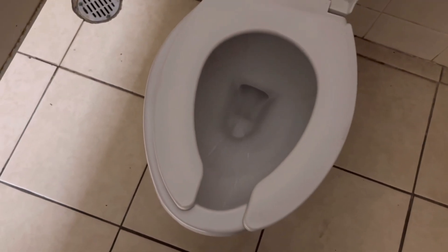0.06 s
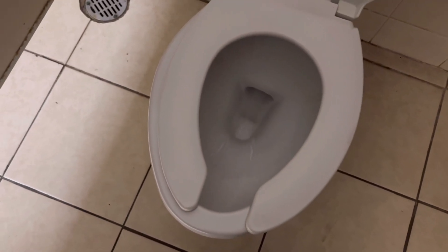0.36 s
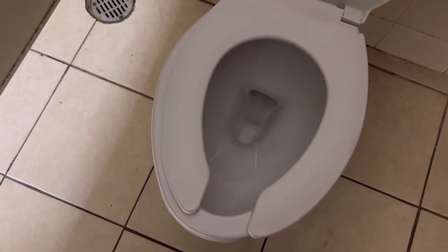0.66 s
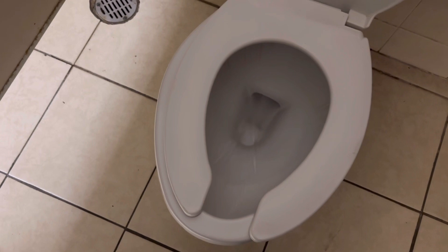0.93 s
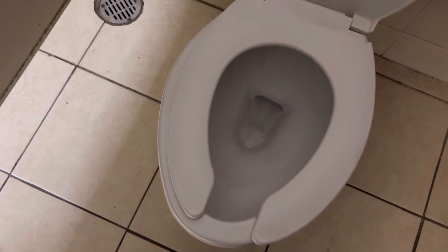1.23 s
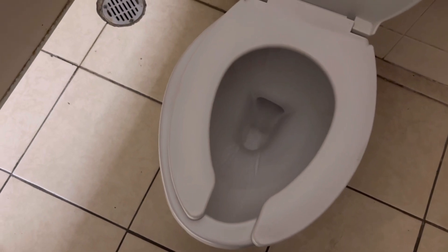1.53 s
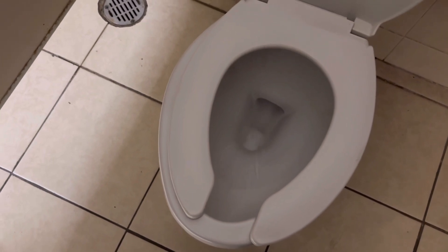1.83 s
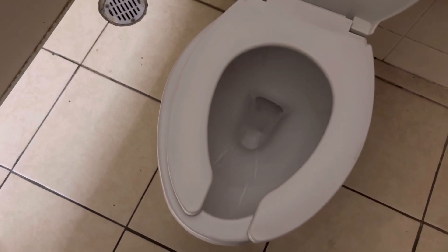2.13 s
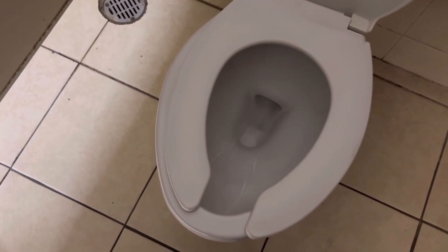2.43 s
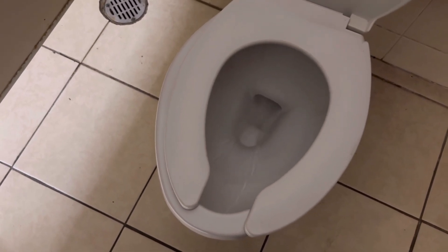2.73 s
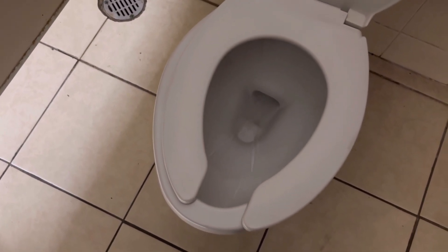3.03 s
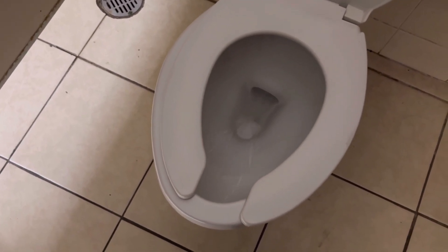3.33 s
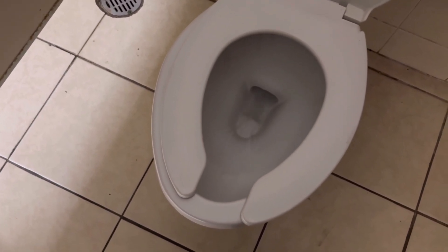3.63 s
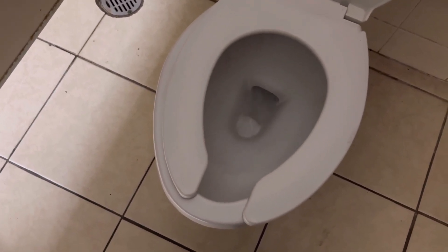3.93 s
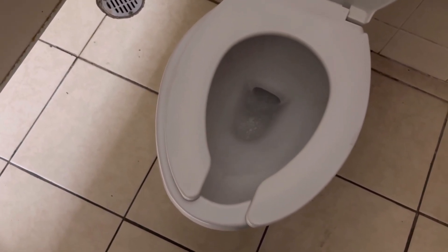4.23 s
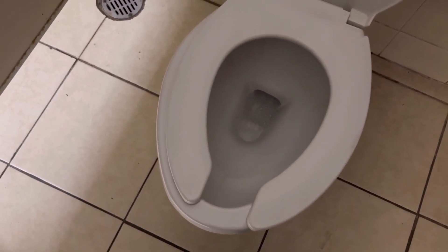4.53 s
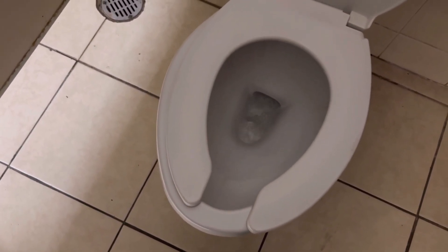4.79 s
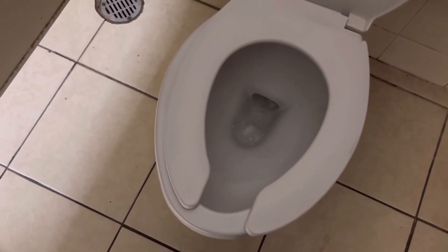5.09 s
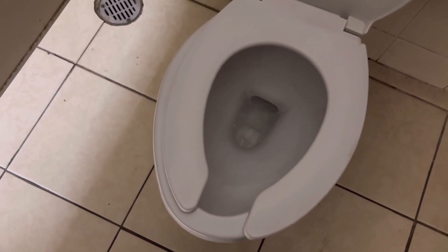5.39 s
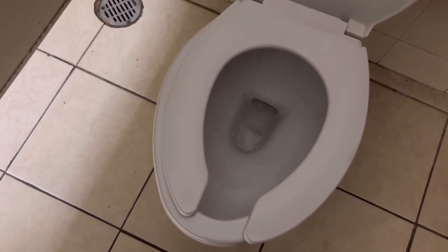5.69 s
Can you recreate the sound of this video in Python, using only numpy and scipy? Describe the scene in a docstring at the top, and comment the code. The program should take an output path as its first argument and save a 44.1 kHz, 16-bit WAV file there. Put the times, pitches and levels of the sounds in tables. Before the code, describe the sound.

A toilet flushes in a small tiled restroom, heard from just above the bowl. Water hisses and spatters loudly while the pool churns, gurgles and booms hollowly. After about three and a half seconds the rush shuts off, the drain gives a few low gulps, and a thin, quiet trickle drips into the water. Ventilation rumbles faintly underneath.

```python
"""A flush-valve toilet in a small tiled restroom, heard from just above the bowl.
Rim jets hiss and spatter; the churning pool makes the air in the drain and bowl boom.
The valve shuts, the siphon breaks with a few gulps, and a thin trickle drips into the pool.
Ventilation rumbles faintly throughout."""
import sys
import numpy as np
from scipy import signal
from scipy.fft import rfft, irfft, next_fast_len
from scipy.io import wavfile
from scipy.ndimage import uniform_filter1d

SR = 44100
rng = np.random.default_rng(int(sys.argv[2]) if len(sys.argv) > 2 else 0)


def to_wav(s):
    """Save 16-bit WAV."""
    ch = np.atleast_2d(s).T  # columns
    pcm = np.round(np.clip(ch, -1, 1) * 32767)  # PCM
    wavfile.write(sys.argv[1], SR, pcm.astype(np.int16))


N = 262383
N_FFT = 2 * next_fast_len(N // 2 + SR // 8, True)
TIME, HZ = np.arange(N) / SR, np.fft.rfftfreq(N_FFT, 1 / SR)

# flow: stutter, steady rush, valve closing, last spurt (time [s], jet hiss [dB], pool churn [dB])
FLOW = [(0, -25.5, -28), (.22, -27.5, -28.5), (.27, -29.5, -26), (.34, -27, -30.5), (.55, -27, -28.5),
        (.66, -27.5, -30), (.85, -26.5, -30), (1.4, -27, -27), (2.05, -26, -30.5), (3.14, -27, -32.5),
        (3.38, -28.5, -36.5), (3.61, -32.5, -36.5), (3.73, -42, -38.5), (3.8, -43, -33.5),
        (3.91, -41, -36.5), (3.97, -54, -41.5), (4.22, -59, -51)]
# bowl resonances over still water (centre [Hz], width [Hz], lift [dB])
STILL_BOWL = [(1625, 53, 7), (2000, 77, 8), (2570, 40, 5), (3485, 55, 6), (4730, 90, 9)]


def from_db(db):
    return 10 ** (np.asarray(db) / 20)


def unit(x):
    """Scales to rms 1."""
    return x / np.sqrt(np.mean(abs(x) ** 2) + 1e-20)


def add(mix, time_s, sound):
    """Mixes a sound in at time_s."""
    part = mix[max(round(time_s * SR), 0):][:len(sound)]
    part += sound[:len(part)]


def over_hz(table, hz):
    """Value columns of a table, interpolated over log frequency."""
    knots_hz, *columns = np.transpose(table)
    return [np.interp(np.log(hz + 1), np.log(knots_hz + 1), c) for c in columns]


def flow_gains(fade_db_per_s):
    """Hiss and churn gains; both fade after the last row of FLOW."""
    times_s, *columns = np.transpose(FLOW)
    fade_db = fade_db_per_s * np.maximum(TIME - times_s[-1], 0)
    return [from_db(np.interp(TIME, times_s, c) - fade_db) for c in columns]


def swell_power(table):
    """Summed power of Gaussian swells."""
    return sum(from_db(db) ** 2 * np.exp(-(2 * (TIME - crest_s) / width_s) ** 2)
               for crest_s, db, width_s in table)


def filtered(x, gain):
    """Applies one gain per frequency."""
    return irfft(rfft(x, N_FFT) * gain, N_FFT)[..., :N]


def shaped(x, spectrum, lift_db=0):
    """Colours a sound by a spectrum table; rms 1."""
    return unit(filtered(x, from_db(over_hz(spectrum, HZ)[0] + lift_db)))


def peaks_db(table):
    """Peaks and dips of a set of resonances."""
    return sum(db / (1 + (2 * (HZ - hz) / width_hz) ** 2) for hz, width_hz, db in table)


def bowl_db():
    """Colour that the porcelain bowl gives to the flush."""
    # bowl resonances (centre [Hz], width [Hz], lift [dB])
    modes = [(502, 10.5, 9.5), (632, 110, 9), (743, 23.5, 6.5), (783, 19, -9.5), (1033, 27, 5.5),
             (1255, 36, 6), (1400, 87, -1), (1624, 113, 7.5), (1903, 59, 8), (2615, 360, -3.5),
             (2930, 62, 5)]
    return peaks_db(modes)


def tiled_room(x, wet_db, colour_db=0):
    """Direct sound in row 0, dense tile reflections in both rows; treble dies first."""
    # room decay (frequency [Hz], t60 [s])
    decay = [(100, 0.99), (1000, 0.96), (2000, 0.49), (6000, 0.41), (15000, 0.54)]
    taps = rng.standard_normal((2, SR // 2)) * (rng.random((2, SR // 2)) < 0.08)
    taps[:, :SR // 250] = 0  # 4 ms pre-delay
    hz, t, bins = signal.stft(taps, SR, nperseg=256)
    t60_s = over_hz(decay, hz)[0][:, None]
    tail = signal.istft(bins * from_db(-60 * t / t60_s), SR, nperseg=256)[1]
    tail /= np.linalg.norm(tail[0])
    wet = signal.fftconvolve(filtered(x, from_db(colour_db))[None], tail, axes=1)[:, :N]
    return np.array([x, np.zeros(N)]) + from_db(wet_db) * wet


def turbulence(patchy_db, flicker_db, surge_db):
    """Two noises sharing time-frequency patches, fast flicker and slow surges; rms 1."""
    bins = signal.stft(rng.standard_normal((2, N)), nperseg=256, noverlap=192)[2]
    patches = uniform_filter1d(rng.standard_normal(bins.shape[1:]), size=14, axis=1)
    patches = uniform_filter1d(patches, size=7, axis=0)
    flicker, surge = rng.standard_normal((2, bins.shape[2]))
    field_db = (patchy_db * unit(patches)
                + flicker_db * unit(uniform_filter1d(flicker, size=5))
                + surge_db * unit(uniform_filter1d(surge, size=30, mode="wrap")))
    return unit(signal.istft(bins * from_db(field_db), nperseg=256, noverlap=192)[1][:, :N])


def spatter(per_s, spread_db):
    """Droplet impacts of random size, each about 1 ms of crackle; rms 1."""
    hits = rng.random(N) < per_s / SR
    clicks = hits * from_db(spread_db * np.minimum(rng.exponential(1, N), 4))
    power = signal.lfilter([1], [1, -np.exp(-1 / 30)], clicks ** 2)
    return unit(np.sqrt(power) * rng.standard_normal((2, N)))


def splash(hz, width, decay_s):
    """Decaying burst of band noise; width is a fraction of hz."""
    t, bin_hz = np.arange(2048) / SR, np.fft.rfftfreq(2048, 1 / SR)
    band = np.exp(-(np.log((bin_hz + 1) / hz) / width) ** 2)
    return unit(irfft(rfft(rng.standard_normal(len(t))) * band)) * np.exp(-t / decay_s)


def slaps(per_s, low_hz, high_hz, spread_db):
    """Lumps of water hit the bowl, each a brief burst at its own pitch; rms 1."""
    out = np.zeros(N)
    for when, size, pitch in rng.random((1200, 3))[:int(per_s * N / SR)]:
        burst = splash(low_hz * (high_hz / low_hz) ** pitch, width=0.15, decay_s=0.0088)
        add(out, when * N / SR, from_db(-spread_db * np.sqrt(size)) * burst)
    return unit(filtered(tiled_room(out, wet_db=-2.5), from_db(bowl_db() / 2)))


def rim_jets():
    """Jets hiss, slap and spurt; the thinning sheet of water breaks into droplets."""
    # jet spectrum (frequency [Hz], level [dB])
    jet_spectrum = [(300, -50), (800, 1.5), (1500, -3), (2500, -1.5), (3400, 1.5), (4600, 1), (6800, -4),
                    (9000, -4.5), (13000, -5.5), (15600, -8.5)]
    # spurt spectrum (frequency [Hz], level [dB])
    spurt_spectrum = [(1000, -40), (2600, -2), (3500, 2), (5200, -1), (7000, -13), (15000, -12)]
    # jet spurts (crest [s], level [dB], width [s])
    spurts = [(.333, -24.5, 0.021), (.43, -29, 0.09), (.98, -27.5, 0.017), (1.71, -28, 0.026),
              (2.04, -29, 0.028), (2.095, -28, 0.05), (2.385, -25, 0.02), (2.52, -29, .025),
              (3.165, -24, 0.0099), (3.35, -29.5, 0.063)]
    hiss, _ = flow_gains(fade_db_per_s=43)
    sheet_share = np.sqrt(hiss / hiss.max())
    rush = turbulence(patchy_db=2, flicker_db=0.33, surge_db=0.4)
    rush += from_db(-7.5) * spatter(per_s=810, spread_db=1)
    thin = turbulence(patchy_db=3.5, flicker_db=2, surge_db=7)
    thin += from_db(-19) * spatter(per_s=140, spread_db=5)
    water = np.sqrt(sheet_share) * from_db(1.25) * shaped(rush, jet_spectrum, bowl_db())
    water += np.sqrt(1 - sheet_share) * from_db(-4) * shaped(thin, jet_spectrum, bowl_db())
    water += from_db(-9.5) * slaps(per_s=190, low_hz=1734, high_hz=5530, spread_db=10)
    spray = shaped(turbulence(patchy_db=3.5, flicker_db=4, surge_db=-0.3), spurt_spectrum, bowl_db())
    return hiss * water + np.sqrt(swell_power(spurts)) * spray


def bubble(hz, t60_s, glide, rise_s=0.004):
    """A trapped bubble swells in and rings; its pitch settles from hz * (1 + glide) to hz."""
    t = np.arange(SR // 12) / SR
    envelope = (1 - np.exp(-(t / rise_s) ** 2)) * from_db(-60 * t / t60_s)
    pitch_hz = hz * (1 + glide * np.exp(-t / 0.0019))
    return envelope / envelope.max() * np.sin(2 * np.pi * np.cumsum(pitch_hz) / SR)


def bubbles(start_s, per_s, low_hz, high_hz, t60_cycles, spread_db):
    """Bubbles of random size from start_s on, each gliding up or down."""
    out, span_s = np.zeros(N), N / SR - start_s
    for when, size, pitch, bend in rng.random((1500, 4))[:int(per_s * span_s)]:
        hz = low_hz * (high_hz / low_hz) ** pitch
        plink = bubble(hz, t60_s=t60_cycles / hz, glide=0.44 * bend - 0.12, rise_s=2 / hz)
        add(out, start_s + when * span_s, from_db(-spread_db * np.sqrt(size)) * plink)
    return out


def pool():
    """Water tumbles and gurgles in the resonant bowl; the jets whip up bright froth."""
    # tumbling water (frequency [Hz], level [dB])
    tumble_spectrum = [(35, -38), (100, -1), (128, 1.5), (215, -2.5), (350, -4.5), (620, -0.5), (1100, 1),
                       (1600, -11), (2600, -9.5), (6000, -54), (15000, -36)]
    hiss, churn = flow_gains(fade_db_per_s=25)
    tumble = shaped(turbulence(patchy_db=1.5, flicker_db=0.5, surge_db=0.9), tumble_spectrum, bowl_db())
    gurgle = bubbles(start_s=0, per_s=130, low_hz=658, high_hz=2353, t60_cycles=26, spread_db=17)
    froth = bubbles(start_s=0, per_s=28, low_hz=1627, high_hz=4880, t60_cycles=18, spread_db=18)
    gurgle = unit(tiled_room(gurgle, wet_db=5, colour_db=bowl_db()))
    froth = unit(tiled_room(froth, wet_db=3.5))
    return churn * (from_db(-0.86) * tumble + from_db(-9.5) * gurgle) + hiss * from_db(-16.5) * froth


def churn_drive():
    """Pool churn relative to full flow (-29 dB)."""
    return flow_gains(fade_db_per_s=24)[1] / from_db(-29)


def sloshing(rate_hz, depth_db):
    """Uneven throb of heaving water, as a gain of rms 1."""
    rate, phase = rng.random((2, 8, 1))
    heave = np.sin(2 * np.pi * (rate_hz * (0.5 + rate) * TIME + phase)).sum(0)
    return unit(from_db(depth_db * np.tanh(unit(heave))))


def air_resonance(spectrum, evenness):
    """Turbulence keeps a resonance sounding; evenness (0-1) smooths its slow beating."""
    noise = shaped(rng.standard_normal((2, N)), spectrum)
    power = uniform_filter1d(noise[0] ** 2, size=5000)
    return unit(noise / (power + 1e-3) ** (evenness / 2))


def drain_air():
    """Air in the drain rumbles with the churn, thuds with slugs of water and idles during refill."""
    # drain air resonance (frequency [Hz], level [dB])
    spectrum = [(55, -32), (72, -25), (79, 9), (83.5, 24), (88, 9.5), (96, 7), (108, -36), (125, -42.5)]
    # slugs of water (crest [s], level [dB], width [s])
    slugs = [(.47, -27, 0.054), (1.1, -35, .08), (1.35, -33, 0.16), (1.78, -29.5, 0.08), (2.06, -33, 0.067),
             (2.78, -29.5, 0.13), (3.16, -30.5, 0.079), (3.78, -30, 0.068), (3.918, -21.5, 0.07)]
    settle_s, settle_db_per_s = 5.5, 4.5
    refill = from_db(-43 - settle_db_per_s * np.maximum(TIME - settle_s, 0))
    rumble = np.hypot(from_db(-36.5) * churn_drive(), refill) * sloshing(rate_hz=6, depth_db=3.5)
    return np.sqrt(rumble ** 2 + swell_power(slugs)) * air_resonance(spectrum, evenness=0.86)


def ringing(hz, wander_hz):
    """Near-pure resonance whose pitch drifts as the water level heaves."""
    drift = unit(filtered(rng.standard_normal(N), np.exp(-(HZ / 6) ** 2)))
    tone = unit(np.sin(2 * np.pi * np.cumsum(hz + wander_hz * drift) / SR))
    return np.array([tone, np.zeros(N)])


def bowl_air():
    """Air in the bowl booms; surges make it ring purely, hard churning adds a hollow overtone."""
    # first air resonance (frequency [Hz], level [dB])
    boom_spectrum = [(200, -54), (232, -37), (245, -7), (255, -9.5), (263, -14.5), (272, 0), (287, -5.5),
                     (305, -7.5), (325, -14.5), (380, -54)]
    # second air resonance (frequency [Hz], level [dB])
    overtone_spectrum = [(520, -28), (585, -3), (604, 2), (613, 18), (630, -6.5), (662, -23), (740, -36)]
    # pool surges (crest [s], level [dB], width [s])
    surges = [(.18, -27, 0.059), (.33, -41, 0.069), (.455, -25.5, 0.06), (.82, -34, 0.045),
              (.97, -28, 0.03), (1.12, -28, 0.055), (1.27, -32.5, 0.19), (1.48, -23, 0.045),
              (1.61, -25, 0.027), (1.76, -27, 0.046), (2.53, -29.5, 0.044), (3.09, -32, 0.075),
              (3.37, -29, 0.054), (3.67, -31, 0.04), (3.83, -28.5, 0.026), (3.92, -28, 0.025),
              (4.27, -45, 0.036), (4.34, -39.5, 0.049), (4.395, -36, 0.034)]
    drive, refill = churn_drive(), from_db(-50)
    boom = np.hypot(from_db(-33.5) * drive ** 0.78, refill) * sloshing(rate_hz=6, depth_db=1)
    power = boom ** 2 + swell_power(surges)
    roughness = np.clip(boom ** 2 / power, 0, 1)
    rough = roughness * air_resonance(boom_spectrum, evenness=0.58)
    pure = np.sqrt(1 - roughness ** 2) * ringing(hz=272.7, wander_hz=4.564)
    hollow = from_db(-5.5) * boom * np.minimum(drive, 1) ** 0.41
    return np.sqrt(power) * (rough + pure) + hollow * air_resonance(overtone_spectrum, evenness=0.53)


def ventilation():
    """Steady low noise of the room ventilation."""
    # ventilation noise (frequency [Hz], level [dB])
    spectrum = [(20, -30), (32, -13), (44, -1.5), (58, 1), (100, -13), (140, -4.5), (210, -21), (450, -21),
                (700, -20.5), (1200, -34), (4000, -56), (15000, -88)]
    return from_db(-46) * shaped(rng.standard_normal((2, N)), spectrum)


def glugs():
    """Collapsing air pockets ring the bowl's overtone, each at a slightly different pitch."""
    # collapses (crest [s], level [dB])
    collapses = [(.108, -24), (.167, -30), (.255, -39), (.338, -29), (.447, -25.5), (.607, -29.5),
                 (.676, -30), (.763, -38), (.934, -31.5), (1.156, -29), (1.2, -30), (1.26, -31),
                 (1.397, -25), (1.492, -35.5), (1.604, -28), (1.668, -30), (2.038, -31), (2.128, -31),
                 (2.414, -35.5), (2.507, -32), (2.555, -34), (2.955, -32)]
    width_s = 0.021
    power = swell_power([(crest_s, db, width_s) for crest_s, db in collapses])
    return np.sqrt(power) * ringing(hz=626, wander_hz=10)


def bursts():
    """Large bubbles pop in the churn, rising in pitch, each in a puff of spray."""
    # pops (time [s], peak [dB], pitch [Hz])
    pops = [(.227, -25, 1630), (.487, -26, 1890), (.605, -24, 1945), (.958, -24.5, 1036),
            (1.215, -24, 1900), (1.537, -30, 980), (1.865, -24, 1930), (2.053, -21, 1960),
            (2.17, -24.5, 1044), (2.236, -26, 1910), (2.239, -26, 1650), (2.59, -23, 1243),
            (3.244, -25, 1800)]
    out = np.zeros(N)
    for time_s, db, hz in pops:
        add(out, time_s, from_db(db) * bubble(hz, t60_s=0.042, glide=-0.15))
        add(out, time_s, from_db(db - 8) * splash(hz, width=0.41, decay_s=0.01))
    return tiled_room(out, wet_db=-6)


def gulps():
    """The siphon breaks: air pockets pass the trap, sagging in pitch as they grow."""
    # air pockets (time [s], peak [dB], pitch [Hz], length [s])
    pockets = [(3.713, -31, 124, 0.05), (3.775, -29.5, 148, 0.034), (3.79, -40, 624, 0.066),
               (3.79, -40, 1144, .03), (3.866, -26, 120, 0.024), (3.886, -28, 91, 0.065),
               (3.992, -32.5, 164, 0.024), (4.017, -41, 404, 0.059), (4.068, -47, 889, 0.057),
               (4.248, -39.5, 662, 0.025), (4.255, -40, 280, 0.047), (4.355, -41.5, 632, 0.047),
               (4.36, -41, 418, 0.025)]
    out = np.zeros(N)
    for time_s, db, hz, length_s in pockets:
        progress = np.arange(0, length_s, 1 / SR) / length_s
        cycles = np.cumsum(hz * (1 + 0.18 * (0.5 - progress))) / SR
        add(out, time_s, from_db(db) * np.sin(np.pi * progress) * np.sin(2 * np.pi * cycles))
    return tiled_room(out, wet_db=-8)


def spits():
    """Spray hits the porcelain: high spits are sharp wide-band ticks, low ones last longer."""
    # spray hits (time [s], relative level [dB], centre [Hz])
    hits = [(3.755, -27, 5670), (3.823, -29, 2560), (3.8557, -20, 12000), (3.865, -25, 4600),
            (3.903, -23.5, 4500), (3.924, -27, 2460), (3.9331, -14.5, 12500), (3.933, -30, 4500),
            (4.012, -35, 8000), (4.0668, -25, 14000), (4.0973, -32.5, 7000), (4.15, -42, 3600),
            (4.256, -33.5, 2480), (4.256, -39, 4000), (4.432, -42, 5800), (4.498, -46, 3700),
            (4.56, -45, 11000), (4.677, -40, 3750), (4.794, -40, 5000), (4.795, -40, 11000),
            (4.821, -42, 4100), (4.874, -45, 4300), (4.9946, -30, 12500), (5.074, -38, 8500),
            (5.208, -41, 3200), (5.591, -38, 3270)]
    out = np.zeros(N)
    for time_s, db, hz in hits:
        add(out, time_s, from_db(db) * splash(hz, width=np.sqrt(hz / 45000), decay_s=32 / hz))
    return from_db(-10.5) * tiled_room(out, wet_db=-7.5)


def drips():
    """Drops splash into the pool and trap ringing bubbles; the bowl colours their echo."""
    # drops, and the quick echo of one low plop
    # (time [s], relative peak [dB], pitch [Hz], initial pitch excess [fraction])
    plinks = [(4.362, -44, 1950, 0.15), (4.364, -41, 1614, 0.072), (4.678, -49, 3650, 0.12),
              (4.711, -44.5, 1730, 0.12), (4.795, -50, 1980, 0.058), (4.843, -43, 1980, 0.28),
              (4.889, -44, 2100, 0.09), (4.892, -43, 1610, 0.04), (5.042, -43, 1970, 0.034),
              (5.084, -44, 1970, 0.21), (5.184, -44, 1965, 0.19), (5.207, -25, 1060, 0.28),
              (5.223, -41, 1940, 0.15), (5.299, -42.5, 1900, 0.32), (5.388, -34, 1950, 0.071),
              (5.449, -44, 1995, 0.095), (5.547, -43, 2220, 0.05), (5.591, -39.5, 2990, 0.225),
              (5.594, -41, 3460, 0.024), (5.68, -33.5, 960, 0), (5.707, -40, 970, 0.15),
              (5.706, -36, 1976, 0.0033), (5.792, -43, 2010, 0.3), (5.845, -40, 2320, 0.22),
              (5.852, -39, 1900, 0.011), (5.904, -46, 1930, 0.059)]
    out = np.zeros(N)
    for time_s, db, hz, glide in plinks:
        add(out, time_s, from_db(db) * bubble(hz, t60_s=0.042, glide=glide))
        add(out, time_s, from_db(db - 13) * splash(hz, width=0.17, decay_s=0.012))
    return from_db(-2.5) * tiled_room(out, wet_db=-10.5, colour_db=peaks_db(STILL_BOWL))


def droplets(start_s, per_s, spread_db):
    """Tiny soft-edged splashes at 3.5-9 kHz."""
    out, span_s = np.zeros(N), N / SR - start_s
    for when, size, pitch in rng.random((600, 3))[:int(per_s * span_s)]:
        drop = splash(3500 + 5500 * np.sqrt(pitch), width=0.054, decay_s=0.0068)
        attack = 1 - np.exp(-np.arange(len(drop)) / SR / 0.002)
        add(out, start_s + when * span_s, from_db(-spread_db * np.sqrt(size)) * attack * drop)
    return out


def trickle():
    """A water film hisses and ticks down the bowl; after the flush it sheds bubbles and droplets."""
    # film on porcelain (frequency [Hz], level [dB])
    film_spectrum = [(300, 1), (700, 0), (1300, -5), (2000, -4.5), (3000, -11.5), (4700, -17), (6000, -45),
                     (8500, -13), (12000, -36), (15500, -49)]
    still_db = peaks_db(STILL_BOWL)
    film = from_db(-57) * shaped(rng.standard_normal((2, N)), film_spectrum, still_db)
    plinks = bubbles(start_s=4.7, per_s=190, low_hz=1450, high_hz=3100, t60_cycles=20, spread_db=14)
    sparkle = droplets(start_s=4.4, per_s=80, spread_db=22)
    plinks = from_db(-47) * tiled_room(plinks, wet_db=-0.5, colour_db=still_db)
    sparkle = from_db(-48) * tiled_room(sparkle, wet_db=-9)
    ticks = from_db(-69.5) * spatter(per_s=110, spread_db=5)
    return film + plinks + sparkle + ticks


def standing_waves(x, ripple_db):
    """Sound trapped between hard walls gains narrow, steady peaks and dips."""
    # stall modes (centre [Hz], width [Hz], lift [dB])
    modes = [(404, 14, 11), (680, 24, -4), (838, 14, -5), (877, 14, 6.5), (1290, 14, -7), (1316, 16, 7),
             (2520, 20, -4), (2562, 22, 7), (3279, 24, 5), (3490, 24, 3), (4087, 44, 3.5)]
    ripple = unit(uniform_filter1d(rng.standard_normal(len(HZ)), size=160))
    ripple_gain = unit(from_db(ripple_db * ripple * HZ / (HZ + 900)))
    return filtered(x, ripple_gain * from_db(peaks_db(modes)))


def stereo(pair):
    """Spreads mid and side into left and right; in the top octaves the two channels turn in and out of phase."""
    # stereo field (frequency [Hz], coherence [0-1], left lead [rad], left minus right [dB])
    field = [(95, 1, 0, 0), (160, .7, 0, -.5), (275, .94, 0, -2.6), (450, .75, 0, 0), (620, .6, .4, 3.5),
             (850, .35, 0, 0), (1150, .65, .4, 0), (1750, .6, -.6, 1), (2400, .72, .5, 2.5),
             (3200, .84, .5, 1.5), (3700, .98, 0, 0), (4900, .98, 0, 0), (5700, .72, -.7, 1.8),
             (7000, .97, 0, 0), (8400, .72, -1.3, 0), (9500, .98, -3, 0), (10500, .98, -3.2, 0),
             (11200, .72, -4.5, 0), (12000, .97, -6.2, 0), (13400, .97, -6.4, 0), (14200, .65, -7.8, 0),
             (14900, .95, -9.4, 0)]
    coherence, lead_rad, balance_db = over_hz(field, HZ)
    mid, side = filtered(pair, np.sqrt([(1 + coherence) / 2, (1 - coherence) / 2]))
    left = filtered(mid + side, from_db(balance_db / 2))
    right = filtered(mid - side, from_db(-balance_db / 2) * np.exp(-1j * lead_rad))
    return np.array([left, right])


def scene():
    """One flush over the ventilation, in stereo."""
    background = ventilation()
    water = standing_waves(rim_jets() + pool() + trickle(), ripple_db=2)
    air = drain_air() + bowl_air()
    return stereo(background + water + air + glugs() + bursts() + gulps() + spits() + drips())


def record(dry):
    """Steep low-pass at 15.72 kHz."""
    taps = signal.firwin(801, 15720, window=("kaiser", 9), fs=SR)
    return signal.oaconvolve(dry, taps[None], "same", axes=1)


dry = scene()
out = record(dry)
to_wav(out)
```